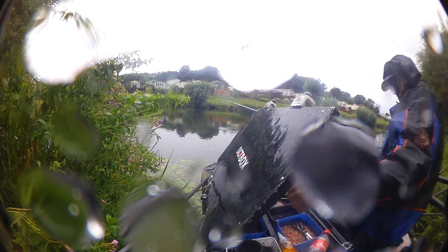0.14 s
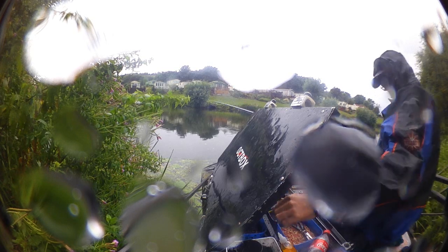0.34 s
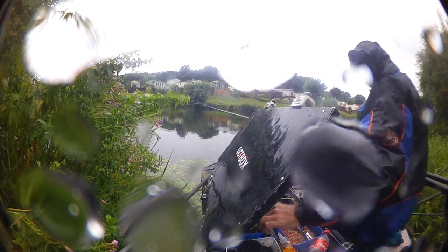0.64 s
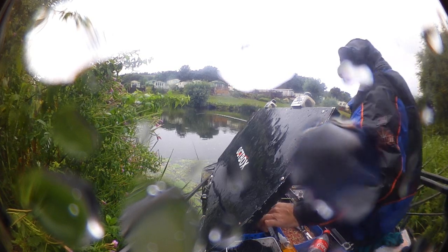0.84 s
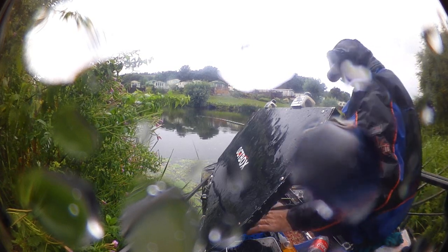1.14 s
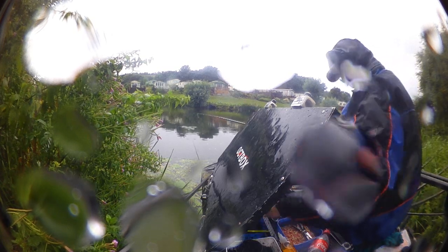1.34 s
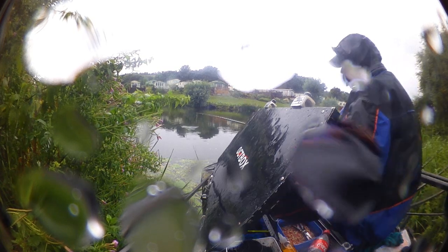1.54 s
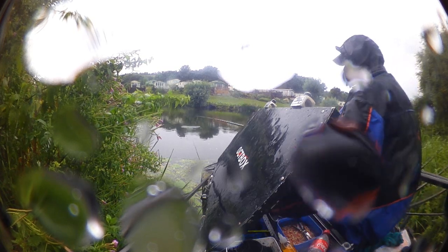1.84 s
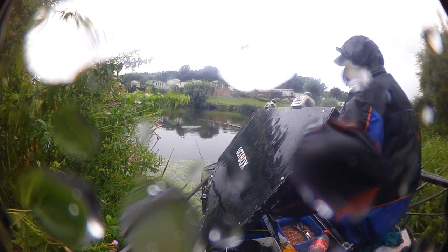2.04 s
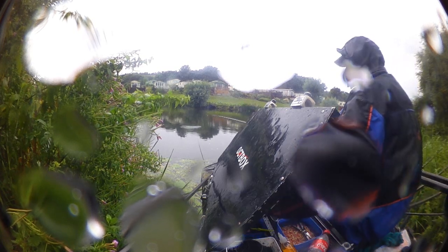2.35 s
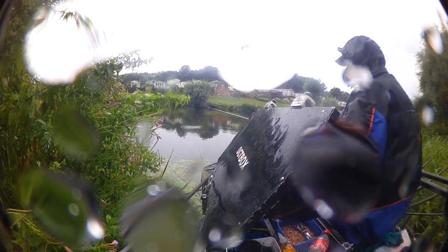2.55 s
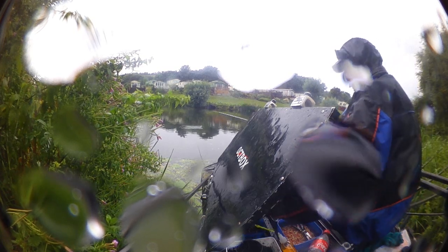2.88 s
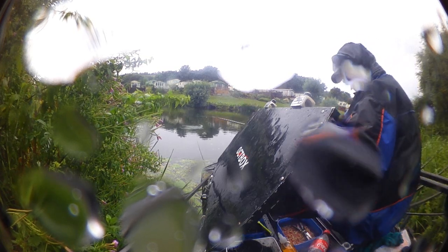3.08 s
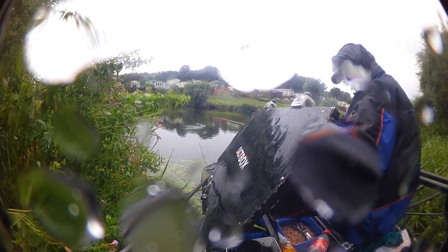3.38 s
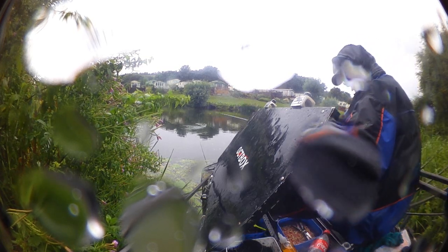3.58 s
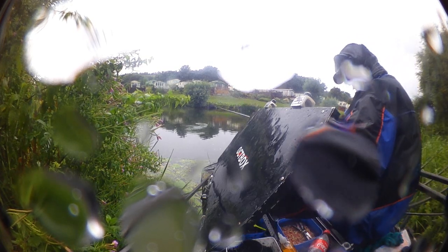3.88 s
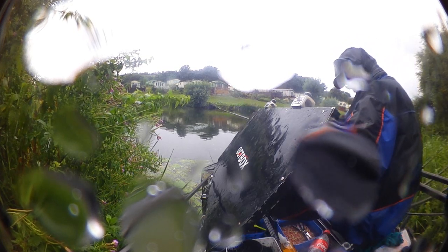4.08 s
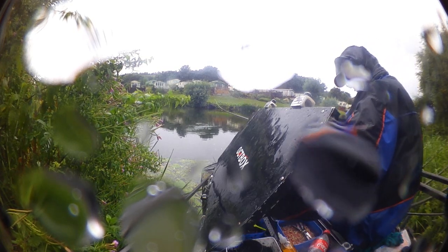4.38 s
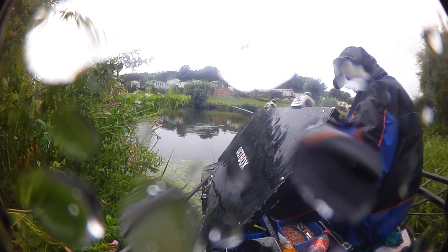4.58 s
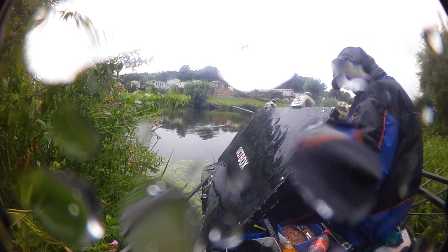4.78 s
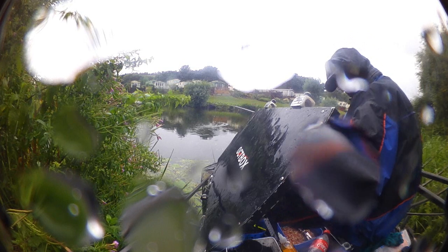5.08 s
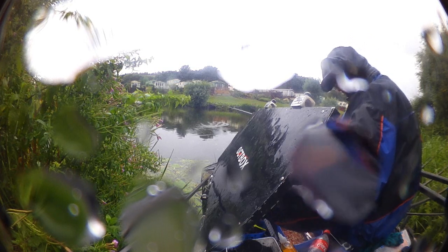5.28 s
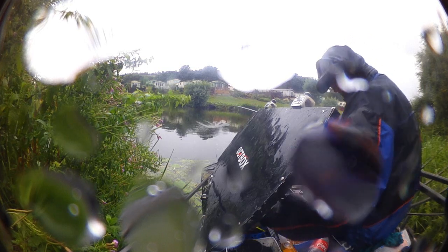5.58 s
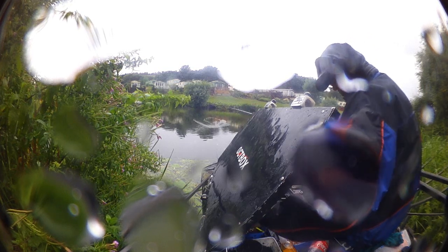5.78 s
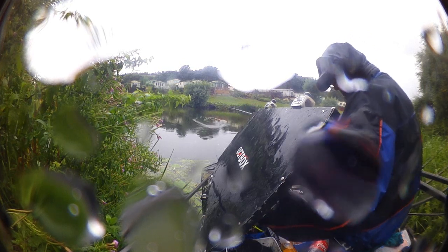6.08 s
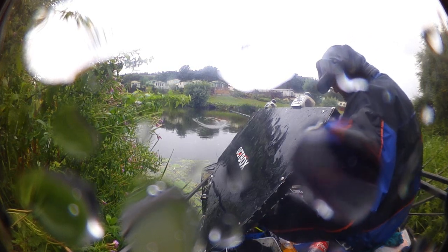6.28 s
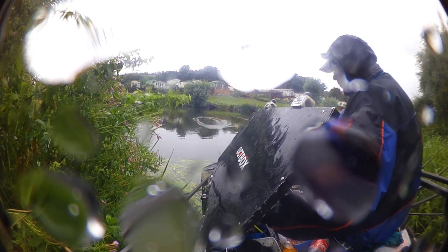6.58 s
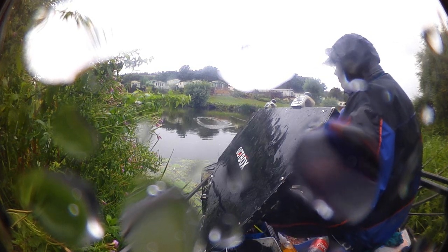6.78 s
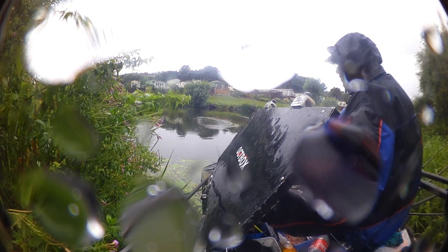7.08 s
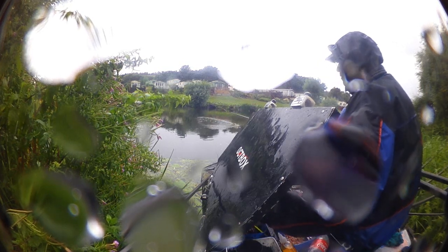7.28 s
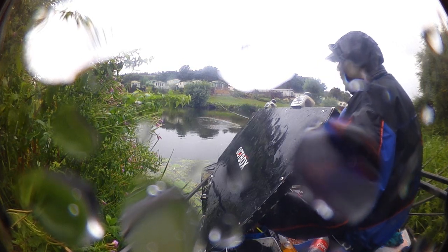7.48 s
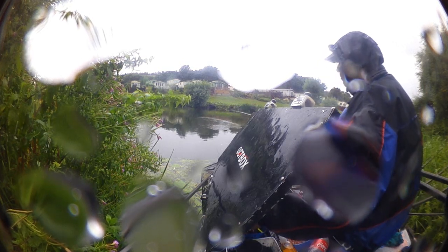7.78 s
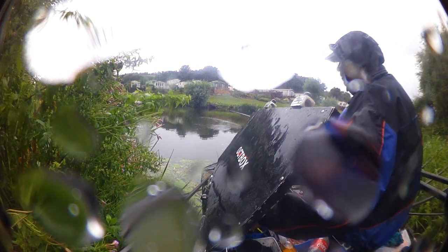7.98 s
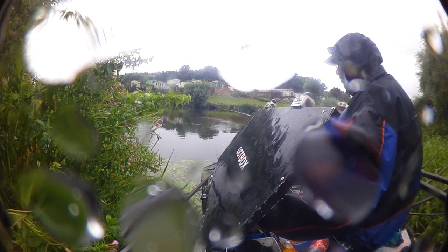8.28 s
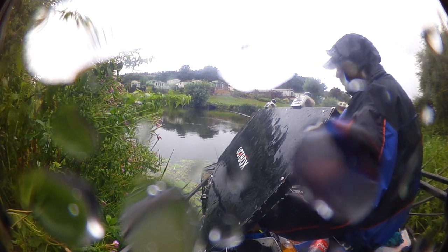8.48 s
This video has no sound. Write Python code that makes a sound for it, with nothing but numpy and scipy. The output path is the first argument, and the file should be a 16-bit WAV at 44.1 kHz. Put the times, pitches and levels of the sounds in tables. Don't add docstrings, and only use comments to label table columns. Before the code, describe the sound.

Rain on a river bank, heard from inside a closed housing on a pole. A brief seat creak opens, with light irregular taps on umbrella cloth and dull low knocks, the strongest around 3.5 seconds. From 4.3 heavy hollow drops shower the housing, loudest around 5 to 6, then thin out. A regular rim drip finishes over fine rustling rain and hiss.

```python
import sys
import numpy as np
from scipy import signal
from scipy.fft import rfft, irfft, next_fast_len
from scipy.io import wavfile
from scipy.ndimage import uniform_filter1d

SR = 44100
rng = np.random.default_rng(int(sys.argv[2]) if len(sys.argv) > 2 else 0)


def to_wav(sig):
    pcm = np.clip(np.atleast_2d(sig), -1, 1) * 32767
    pcm = np.round(pcm).astype(np.int16)
    wavfile.write(sys.argv[1], SR, pcm.T)


def invert_db(level):
    return 10 ** (np.asarray(level, dtype=float) / 20)


N = 380927
TIME = np.arange(N) / SR

# start in seconds, peak in dB, then relative to the peak
# depth in dB, splash in dB and, for some, lower modes in dB above the rule.
CLOTH_DROPS = [(0.27, -48, -3.5, -27), (0.5767, -44.5, -8, -28), (0.6617, -48, -14, -24),
               (0.77, -47.5, -11, -23), (0.8069, -36.5, -22, -29), (0.8734, -46.5, -1.5, -24),
               (0.9463, -45, -7, -28), (1.1037, -33.5, -14, -27), (1.3702, -30, -10, -29),
               (1.408, -31.5, -5, -29, 2), (1.6576, -46.5, -1.5, -29), (1.751, -43, -14, -33),
               (1.839, -37, -14, -37, 6), (2.037, -51, -3, -30), (2.3028, -42.5, 3, -37),
               (2.3341, -42, 0.5, -39), (2.7707, -41, -9.5, -37), (2.806, -47.5, -19, -26),
               (3.024, -55.5, 5.5, -28), (3.303, -46.5, -5, -45), (3.493, -29, -9, -44, 6),
               (3.543, -41, -12, -36), (3.5782, -42.5, -4.5, -40), (3.694, -37.5, -12, -35),
               (3.918, -36.5, -12.5, -35), (3.9616, -34, -11.5, -27), (3.9957, -42, -3, -27),
               (4.119, -54, 4.5, -25)]
# start in seconds, peak in dB, depth in dB, splash in dB,
# lower modes in dB above the rule.
HOUSING_DROPS = [(4.3436, -23.5, -14, -23.5, 0.5), (4.3995, -30.5, -26, -21, 8.5),
                 (4.505, -34.5, -11.5, -34, -0.5), (4.589, -28, -10, -32.5, -8),
                 (4.7191, -33, -9.5, -33, -3), (4.7519, -28, -13.5, -27.5, -3),
                 (4.905, -27, -7.5, -31.5, -8), (4.9969, -34, -10, -38, -6), (5.1882, -23, -9.5, -27, -6),
                 (5.327, -22, -12.5, -23, -6), (5.4435, -31, 2, -50, 3), (5.5318, -27, -8, -28, 1),
                 (5.666, -29.5, -10.5, -22.5, -1), (5.6994, -34.5, -14, -36, -11),
                 (5.7703, -38, -20, -32, 9.5), (6.0703, -20, -16, -28, 4), (6.318, -33, -3, -30, -2),
                 (6.383, -36, -16, -29, 5), (6.451, -43.5, -10, -33, 0), (6.6065, -41, 0.5, -40, 5.5),
                 (6.7473, -49.5, -6, -28, 4), (6.8036, -38.5, -10, -21, -6), (6.8709, -37.5, -8.5, -30, 0),
                 (6.989, -44, -11, -23, 0)]
# start in seconds, peak in dB, depth in dB, splash in dB.
RIM_DROPS = [(7.113, -36, -5, -20.5), (7.2421, -38.5, -3, -22), (7.359, -37.5, -8.5, -20.5),
             (7.469, -44.5, -7, -26), (7.5916, -31.5, -11, -29), (7.7, -38, -10.5, -20),
             (7.8263, -36.5, -5.5, -18.5), (7.9337, -40.5, -8, -42), (8.0503, -31, -10.5, -21.5),
             (8.264, -33, -8.5, -22), (8.4672, -32, -16, -39)]
# start in seconds, peak in dB, depth in dB, splash in dB.
STRAY_DROPS = [(0.86, -49, -3, -30), (1.71, -51, -13, -30), (1.876, -49, -8, -30), (2.212, -50, -6, -30),
               (2.604, -56, -14, -30), (3.171, -45, -8, -30), (4.211, -50.5, -13, -30),
               (4.661, -50, -13, -30), (4.828, -49, -10, -30), (4.869, -50, -8, -30),
               (4.973, -52, -10, -33), (5.038, -43, -8, -35), (5.231, -38, -10, -30), (5.255, -40, -8, -30),
               (5.487, -46.5, -14, -30), (5.8, -48, -10, -30), (5.928, -51, -14, -30),
               (5.954, -50, -18, -30), (6.159, -50, -10, -30), (6.192, -47, -10, -30),
               (6.682, -49, -6, -30), (6.783, -47, -8, -30), (7.539, -51, -8, -30), (8.3, -46, -14, -28),
               (8.42, -53, -7, -30), (8.598, -53, -10, -30)]
# spreading time in seconds, upper modes in dB, body pitch as a factor,
# impact in dB.
SURFACES = [
    (0.011, 2, 0.97, -5),
    (.014, 3, 0.949, -4),
    (0.017, 1, 1.05, -0.5),
    (0.013, -1, 1.1, -6),
]
# centre in Hz, width in Hz, level in dB.
HOLLOW_MODES = [(500, 85, -0.5), (570, 68.6, -1.5)]
LOWER_MODES = [(700, 80, -3), (795, 128, -1.5), (855, 68, 1.5), (965, 26, -2)]
BODY_MODES = [(1220, 163, 17), (1370, 73, 1.5), (1471, 217, 15), (1740, 120, 3.5), (1910, 57, -6),
              (2070, 140, 7)]
UPPER_MODES = [(2480, 320, 2), (2850, 300, 4), (3300, 330, 4), (3800, 500, 1), (4600, 450, 12)]
SPLASH_MODES = [(6300, 2000, 2.5), (7830, 1000, 13), (9400, 2000, 8), (12500, 1200, -21.5)]
FIZZ_LASTS = (1.1, 1.36, 0.92, 0.41)
# start in seconds, peak in dB, pitch in Hz, fall by 60 dB in seconds.
PANEL_RINGS = [(1.1038, -38, 1330, 0.068), (1.3693, -36, 1340, 0.09), (3.492, -30.5, 1300, 0.059),
               (3.695, -45, 1305, 0.09), (3.9195, -44, 1326, 0.083), (3.963, -41, 1580, 0.09),
               (4.344, -27.5, 1310, 0.078), (4.3989, -42, 1080, 0.09), (4.588, -34, 1353, 0.097),
               (4.7521, -39, 1364, 0.073), (4.9052, -39, 1310, 0.085), (5.1896, -31, 1530, 0.09),
               (5.3262, -25.5, 1173, 0.096), (5.531, -34, 1325, 0.12), (5.667, -41, 1330, 0.09),
               (5.6989, -38, 1360, 0.072), (6.0703, -24, 1300, 0.073), (6.3154, -43, 1204, 0.097),
               (6.383, -42, 1290, 0.082), (6.8674, -42, 1190, 0.12), (7.1137, -50, 1170, 0.1),
               (7.241, -44, 1560, 0.064), (7.3594, -49, 1180, 0.09), (7.5915, -40, 1190, 0.09),
               (7.6994, -47, 1365, 0.082), (7.8258, -46, 1574, 0.081), (7.9354, -45, 1430, 0.056),
               (8.0495, -35, 1186, 0.07), (8.2634, -40.5, 1490, 0.065), (8.468, -46, 1330, 0.11)]
# start in seconds, peak in dB.
SPITS = [(4.4144, -59), (5.1848, -38), (5.2054, -47), (5.257, -58), (5.311, -45), (5.344, -53),
         (5.3674, -59), (5.5119, -51), (5.914, -57), (7.0105, -57), (7.222, -56), (7.2344, -65),
         (7.2779, -54), (7.3144, -57), (7.527, -56), (7.754, -50), (7.9608, -49), (7.9744, -59),
         (8.4916, -52)]
# start in seconds, peak in dB, ring in Hz, fall in seconds.
KNOCKS = [(0.059, -33, 181, 0.011), (0.119, -45.5, 196, 0.023), (0.227, -42.5, 187, 0.012),
          (0.373, -36.5, 173, 0.0081), (0.977, -42, 224, 0.01), (1.156, -29.5, 191.6, 0.0095),
          (1.414, -24, 213.5, 0.013), (1.43, -19.5, 184.3, 0.013), (1.586, -41, 180, 0.011),
          (1.757, -19, 190, 0.0045), (1.845, -27.5, 178, 0.012), (2.024, -31.5, 157, 0.0097),
          (2.194, -39, 180, 0.0082), (2.273, -36.5, 224.6, 0.036), (2.311, -26.5, 216.5, 0.0073),
          (2.342, -30, 220, 0.018), (2.407, -39.5, 166, 0.013), (3.034, -41, 202, 0.013),
          (3.11, -40.5, 215, 0.02), (3.144, -34.5, 221, 0.014), (3.224, -39.5, 226, 0.015),
          (3.277, -35.5, 219, 0.017), (3.319, -37, 269, 0.0097), (3.4955, -12.5, 213, 0.0054),
          (4.87, -36.5, 228, 0.0066), (5.448, -17, 188, 0.014), (5.871, -34.5, 220, 0.029),
          (6.264, -41.5, 172, 0.0092), (6.322, -25.5, 175.4, 0.013), (6.607, -27.5, 202, 0.0059)]
# start in seconds, peak in dB, ring in Hz, fall in seconds.
NUDGES = [(0.338, -43.5, 183, 0.012), (0.703, -52, 176, 0.01), (0.775, -44.5, 227, 0.0095),
          (1.04, -45.5, 207, 0.011), (1.241, -49, 183, 0.0088), (1.344, -38.5, 186, 0.0095),
          (1.635, -38, 137, 0.009), (2.768, -42.5, 204, 0.01), (3.705, -50, 219, 0.011),
          (4.093, -42.5, 183, 0.0079), (4.342, -40, 255, 0.0068), (4.603, -49, 200, 0.01),
          (4.644, -44, 198, 0.012), (4.771, -43.5, 186, 0.011), (4.996, -42.5, 246, 0.0074),
          (5.378, -48, 175, 0.0093), (5.745, -39, 173, 0.014), (6.069, -43, 151, 0.012),
          (6.164, -45.5, 163, 0.01), (6.227, -43.5, 154, 0.01), (6.442, -51.5, 191, 0.009),
          (6.837, -47, 185, 0.011), (7.858, -53.5, 178, 0.0088), (8.167, -49, 186, 0.01),
          (8.372, -52, 186, 0.011)]
# start in seconds,
# length in seconds, level in dB, centre in Hz, width in Hz.
SLIDES = [(0.02, 0.11, -66, 1400, 1490), (0.12, 0.12, -64, 1290, 1800), (.762, 0.18, -58, 1130, 1190),
          (2.288, 0.087, -55, 1100, 1330), (3.022, 0.082, -60, 1070, 1390), (3.292, 0.057, -55, 1510, 1269),
          (3.576, 0.072, -55.5, 1830, 700), (3.572, 0.071, -56, 1370, 600), (3.61, 0.058, -53, 500, 170),
          (4.335, .022, -40, 1050, 400), (3.44, 0.053, -56, 500, 170), (.008, .035, -54, 375, 120),
          (3.97, .1, -51, 290, 170), (1.335, .075, -49, 270, 170), (4.63, .06, -54, 300, 170),
          (8.38, .2, -58, 130, 150), (.88, .12, -52, 110, 100), (3.638, 0.053, -64, 1800, 700),
          (3.982, 0.041, -57, 1520, 1512), (4.132, .045, -57, 840, 1090), (5.204, 0.12, -62, 1300, 3480),
          (5.215, 0.13, -78, 8050, 8000), (5.319, 0.062, -68, 8400, 8000), (5.909, 0.061, -69, 8200, 7000),
          (6.853, 0.092, -63, 1380, 1300)]
# time in seconds, slip rate in Hz, level in dB.
CREAK = [
    (.11, 505, -68),
    (.125, 522, -65),
    (.14, 611, -58),
    (.16, 650, -55),
    (.18, 707, -58.5),
    (.195, 665, -53),
    (.208, 575, -58.5),
    (.225, 550, -58),
    (.25, 570, -81),
]
# time in seconds, pitch in Hz, level in dB.
SEAT_HUM = [
    (0, 509, -54.5),
    (.04, 500, -53.5),
    (.065, 500, -40.5),
    (.095, 500, -60.5),
    (.125, 522, -43.5),
    (.155, 541, -45.5),
    (.19, 502, -59),
    (.23, 516, -72),
]
# start in seconds, peak in dB, start pitch in Hz, end pitch in Hz,
# length in seconds.
DRIPS = [
    (2.028, -50, 800, 1450, .028),
    (1.965, -72, 7400, 7600, .035),
    (3.95, -72, 6200, 6400, .04),
    (4.675, -56, 850, 1550, .042),
]
# time in seconds, sway level in dB.
WIND = [(0.0, -61), (0.31, -63.5), (0.67, -62), (1.42, -46.5), (2.11, -57.5), (2.57, -56), (2.93, -55),
        (4.18, -52.5), (4.43, -68.5), (4.69, -53), (4.86, -49), (5.2, -53), (5.51, -49), (5.92, -47.5),
        (6.62, -60), (6.83, -53.5), (7.05, -75.5), (8.64, -66.5)]
# centre in seconds, sway level in dB, length in seconds.
LURCHES = [(1.165, -46, 0.016), (1.452, -32.5, 0.035), (1.79, -57, 0.032), (1.916, -40.5, 0.067),
           (2.072, -43, 0.026), (2.272, -46.5, 0.11), (2.436, -46.5, 0.037), (2.69, -47.5, 0.052),
           (3.274, -46, 0.038), (3.524, -51, 0.03), (4.165, -43.5, 0.02), (4.891, -42.5, 0.027),
           (5.475, -30.5, 0.015), (5.77, -34, 0.02), (5.891, -36.5, 0.044), (6.317, -35, 0.027),
           (6.642, -46, 0.025)]
# frequency in Hz, density in dB per Hz.
SWAY_COLOUR = [(12, -46), (20, -20.5), (43, -4.5), (64, 1), (79, 0), (130, -0.5), (170, -31.5), (290, -120)]
RUSTLE_COLOUR = [(180, -46.5), (300, -30), (335, -6.5), (417, -2), (519, 3), (678, -5.5), (875, -3.5),
                 (1050, -9.5), (1320, -4.5), (1840, -16), (3340, -27.5), (4580, -38), (5500, -84),
                 (7150, -81.5), (12100, -120)]
HISS_COLOUR = [(2650, -12), (4500, -16), (6240, -18), (6820, -20), (7790, -12), (12400, -6), (13300, -15.5),
               (13500, -39), (13900, -45)]
# time in seconds, change in dB.
RAIN_RISE = [
    (0, 1.5),
    (4.2, 0.5),
    (5.2, 1.5),
    (6.9, 1.5),
    (7.1, 3),
    (8.64, 3),
]
# frequency in Hz, lead of the left port in radians.
PORT_LEAD = [(40, .5), (110, .9), (270, .45), (550, 1.), (850, -.9), (1460, .2), (2400, -.3), (4000, 0)]


def unit(x):
    return x / np.max(np.abs(x))


def add(out, x, s):
    i = int(s * SR)
    out[..., i:i + x.shape[-1]] += x[..., :N - i]


def left_right(db):
    return invert_db(np.array([[db], [-db]]))


def modes(hz, table, gain=1, detune=1):
    centre, width, db = np.transpose(table)[:, :, None]
    centre = centre * detune
    resonance = 1j * hz * width / (centre ** 2 - hz ** 2 + 1j * hz * width)
    return np.sum(gain * invert_db(db) * resonance, axis=0)


def dull(hz, edge_hz, order):
    return (1 + 1j * np.sqrt(2) * hz / edge_hz - (hz / edge_hz) ** 2) ** -order


def curve(hz, table):
    f, db = np.transpose(table)
    return invert_db(np.interp(np.log(hz + 1), np.log(f), db, left=-80, right=-80))


def over_time(table):
    return np.interp(TIME, *np.transpose(table))


def walk(rate):
    k = int(SR / rate)
    held = np.repeat(rng.standard_normal(N // k + 1), k)
    return 1.3 * uniform_filter1d(uniform_filter1d(held, k), k)[:N]


def noise(gain, alike, grain_db=0):
    size = next_fast_len(N)
    mid, side = rng.standard_normal((2, N)) * invert_db(grain_db * walk(250))
    pair = np.sqrt(1 + alike) * mid + np.sqrt(1 - alike) * side * np.array([[1], [-1]])
    x = irfft(rfft(pair, size) * gain(np.fft.rfftfreq(size, 1 / SR)), size)[:, :N]
    return x / np.sqrt(np.mean(x ** 2))


def taps():
    size = 4096
    spot_db, spot_tune, stereo_db = 2.0, 0.02, 1.8
    splash_s, linger_s, linger_db = 0.007, 0.031, -11
    out, t, hz = np.zeros((2, N)), TIME[:size], np.fft.rfftfreq(size, 1 / SR)
    parts = [(HOLLOW_MODES, dull(hz, 1060, order=2), 2.5, -4.5),
             (LOWER_MODES, dull(hz, 1014, order=2), 0.8, -4.5),
             (BODY_MODES, dull(hz, 2650, order=3), -4.0, 0),
             (UPPER_MODES, dull(hz, 3000, order=3), 0.4, 0)]
    spray = modes(hz, SPLASH_MODES) * (hz / 4500) ** 4 * dull(hz, 2800, order=2)
    impact = unit(irfft(modes(hz, [(1200, 650, 0)]) * dull(hz, 2150, order=3)))
    impact = invert_db(-8.0) * impact * left_right(-2.2)
    drop_tables = (CLOTH_DROPS, HOUSING_DROPS, RIM_DROPS, STRAY_DROPS)
    drops = [(surface, row) for table, surface in zip(drop_tables, SURFACES) for row in table]
    for (spread_s, bright_db, pitch, impact_db), (s, db, depth_db, splash_db, *extra_db) in drops:
        fizz = rng.standard_normal((2, size))
        fade_s = np.clip(spread_s * invert_db(-0.35 * (depth_db + 9.5)), 0.002, 0.05)
        shiver = np.exp(-t / fade_s) + invert_db(linger_db) * np.exp(-t / linger_s)
        burst = (fizz + 0.5 * fizz[::-1]) * (np.exp(-t / splash_s) + invert_db(-8.0) * shiver)
        drop = invert_db(impact_db) * impact + invert_db(splash_db) * unit(irfft(rfft(burst) * spray))
        levels_db = (depth_db + 0.5,
                     -2 + 0.73 * depth_db + sum(extra_db) - 1.5,
                     -4.5,
                     -19 + bright_db + 0.3 * splash_db)
        for (table, shell, pan_db, fizz_db), part_db, lasts in zip(parts, levels_db, FIZZ_LASTS):
            wet = rfft(invert_db(-25) * fizz[0] * shiver ** (1 / lasts))
            level_spot, tune_spot, side_spot = rng.standard_normal((3, len(table), 1))
            sense = (-1.0) ** np.arange(len(table))[:, None] * invert_db(spot_db * level_spot)
            tune = (pitch if table is BODY_MODES else 1) + spot_tune * tune_spot
            lean_db = stereo_db * side_spot + pan_db / 2
            ears = np.array([modes(hz, table, sense * invert_db(ear * lean_db), tune) for ear in (1, -1)])
            drop += invert_db(part_db) * unit(irfft((1 + wet * invert_db(fizz_db)) * shell * ears))
        add(out, drop * invert_db(db), s)
    return out


def panel_rings():
    out, t = np.zeros((2, N)), TIME[:6000]
    rise = 1 - np.exp(-t / 0.002)
    for s, db, hz, t60 in PANEL_RINGS:
        waver_db = 3.8 * np.interp(t, t[::150], rng.standard_normal(40))
        fade = invert_db(-60 * t / np.clip(t60, 0.02, 0.2) + waver_db) * rise
        add(out, invert_db(db - 5) * fade * np.sin(2 * np.pi * hz * t) * left_right(-2.5), s)
    return out


def spits():
    out, t = np.zeros((2, N)), TIME[:2048]
    hz = np.fft.rfftfreq(len(t), 1 / SR)
    bright = modes(hz, [(7800, 2300, -2.2), (9140, 2500, 0), (12600, 4300, 1.7)]) ** 2
    for s, db in SPITS:
        burst = rng.standard_normal((2, len(t))) * np.exp(-t / 0.0056)
        add(out, invert_db(db) * unit(irfft(rfft(burst) * bright)), s)
    return out


def knocks():
    bounce_s, bounce_db, bounce_life = 0.01914, -11, 0.86
    pair, pair_db = 1.384, -16
    out, t = np.zeros(N), TIME[:12000]
    for s, db, hz, fall in KNOCKS + NUDGES:
        rise = 0.008 + 0.2 * fall
        ring = np.sin(2 * np.pi * hz * t) + invert_db(pair_db) * np.sin(2 * np.pi * pair * hz * t)
        swell = np.sin(np.pi / 2 * np.clip(t / rise, 0, 1)) ** 2
        after = np.clip(t - rise, 0, None)
        add(out, invert_db(db) * ring * swell * np.exp(-(after / fall) ** 2), s - 0.003)
        add(out, invert_db(db + bounce_db) * ring * swell * np.exp(-after / fall / bounce_life), s + bounce_s)
    return out


def slides():
    out, scratch = np.zeros((2, N)), walk(167)
    for s, length, db, centre_hz, width_hz in SLIDES:
        count = int(length * SR)
        hz = np.fft.rfftfreq(count, 1 / SR)
        apart = min(centre_hz / 1000, 1)
        rasp = invert_db(1.5 * scratch[int(s * SR):][:count])
        mid, side = rng.standard_normal((2, count)) * rasp
        pair = [mid + 0.97 * apart * side, mid - 0.12 * apart * side]
        grit = irfft(rfft(pair) * modes(hz, [(centre_hz, width_hz, 0)]) ** 4, count)
        add(out, invert_db(db) * grit / np.std(grit) * np.hanning(count) ** 0.22, s)
    return out


def stick_slip(table, partials_db, rough):
    s, hz, db = np.transpose(table)
    phase = 2 * np.pi * np.cumsum(np.interp(TIME, s, hz) * (1 + rough * walk(150))) / SR
    level = invert_db(np.interp(TIME, s, db, left=-120, right=-120) + 3.6 * walk(110.3))
    partials = sum(invert_db(p) * np.sin((k + 1) * phase) for k, p in enumerate(partials_db))
    return np.sqrt(2) * level * partials


def seat():
    creak = stick_slip(CREAK, [-1.5, -1.5, -14.0], rough=0.04)
    return creak + stick_slip(SEAT_HUM, [-0.5, -24.0, -19.0], rough=0.023)


def drips():
    out = np.zeros(N)
    for s, db, start_hz, end_hz, length in DRIPS:
        u = TIME[:int(length * SR)] / length
        hz = start_hz + (end_hz - start_hz) * np.sqrt(u)
        add(out, invert_db(db) * np.sin(np.pi * u ** 0.17) * np.sin(2 * np.pi * np.cumsum(hz) / SR), s)
    return out


def lurches():
    t = TIME[::64]
    return np.interp(TIME, t, sum(invert_db(2 * db) * np.exp(-((t - s) / length) ** 2) for s, db, length in LURCHES))


def aftershake():
    out, t = np.zeros(N), TIME[:12000]
    swell = (1 - np.exp(-(t / 0.008) ** 2)) ** 2
    for s, db, *_ in KNOCKS:
        add(out, invert_db(2 * (db - 23)) * np.exp(-t / 0.037) * swell, s)
    return out


def pole_sway(wind_db, surge):
    sway = noise(lambda hz: curve(hz, SWAY_COLOUR), 1.0) * invert_db(wind_db + 1.3 * walk(22))
    lurch = noise(lambda hz: curve(hz, SWAY_COLOUR) * dull(hz, 75, order=1), 0.86) * np.sqrt(surge)
    bank = noise(lambda hz: modes(hz, [(115, 130, 0)]) ** 2, 0.74)
    return (sway + lurch) * left_right(0.8) + invert_db(-64) * bank


def mount_buzz(wind_db, surge, calm_db):
    sway_db = 10 * np.log10(invert_db(2 * wind_db) + surge)
    steady_db = -56 + 0.48 * (sway_db - calm_db)
    buzz_db = 10 * np.log10(invert_db(2 * steady_db) + aftershake())
    mount_modes = [(180.0, 154, -0.5), (269.6, 40, -7.0)]
    buzz = noise(lambda hz: modes(hz, mount_modes) ** 2 * dull(hz, 328, order=2), 1.0)
    return buzz * invert_db(buzz_db + 2.5 * walk(30))


def rustle(wind_db, calm_db):
    near_db = -59 + 0.22 * (wind_db - calm_db)
    near = noise(lambda hz: curve(hz, RUSTLE_COLOUR) * dull(hz, 2040, order=2), 0.52, grain_db=1.0)
    bright = lambda hz: (hz / 1900) ** 4 * dull(hz, 2070, order=2)
    far = noise(lambda hz: curve(hz, RUSTLE_COLOUR) * bright(hz), 0.15, grain_db=1.0)
    far_db = -70.0 + 0.16 * (near_db - np.mean(near_db))
    return near * invert_db(near_db + 1.4 * walk(40)) + far * invert_db(far_db)


def far_rain():
    hiss = noise(lambda hz: curve(hz, HISS_COLOUR), 0.017, grain_db=0.5)
    return hiss * invert_db(-77.5 + over_time(RAIN_RISE) + 0.22 * walk(36)) * left_right(1.1)


def weather():
    wind_db, surge, calm_db = over_time(WIND), lurches(), -56
    return pole_sway(wind_db, surge) + mount_buzz(wind_db, surge, calm_db) + rustle(wind_db, calm_db) + far_rain()


def ports(x):
    size = next_fast_len(N)
    lead = np.interp(np.fft.rfftfreq(size, 1 / SR), *np.transpose(PORT_LEAD))
    return irfft(rfft(x, size) * np.exp(0.5j * lead * np.array([[1], [-1]])), size)[:, :N]


def scene():
    through_shell = taps() + panel_rings() + knocks() * left_right(0.3) + seat() + weather()
    return ports(through_shell) + spits() + slides() + drips()


def roll_off(x):
    return signal.sosfilt(signal.butter(12, 14080, fs=SR, output="sos"), x)


def record(dry):
    top = signal.ellip(10, 0.3, 70, 13200, fs=SR, output="sos")
    mix = signal.sosfilt(top, dry)
    return roll_off(mix)


dry = scene()
out = record(dry)
to_wav(out)
```